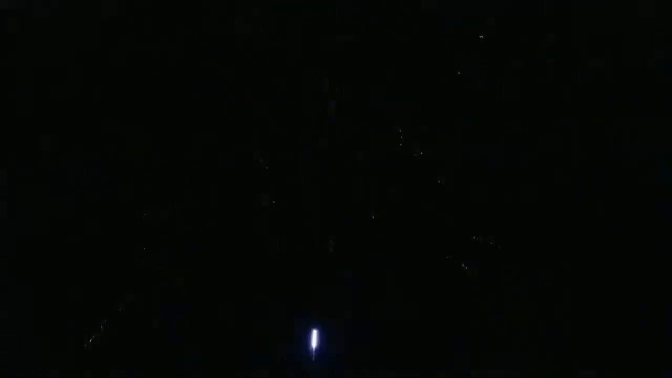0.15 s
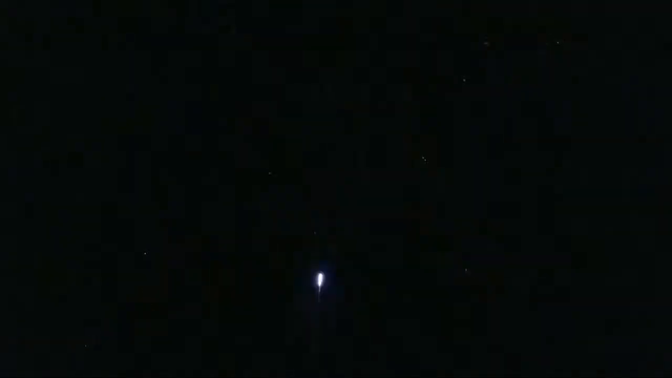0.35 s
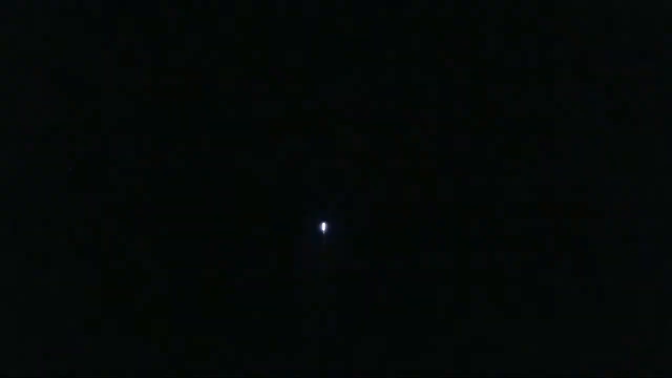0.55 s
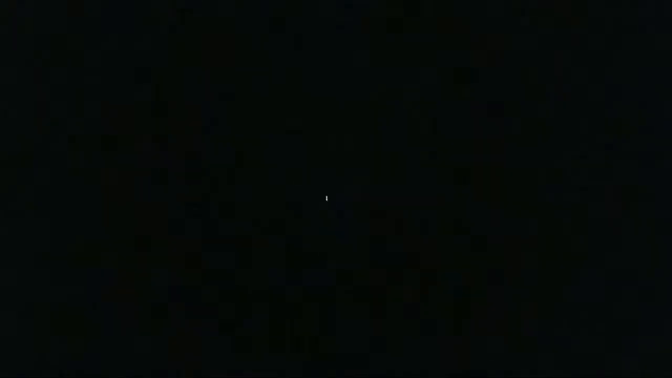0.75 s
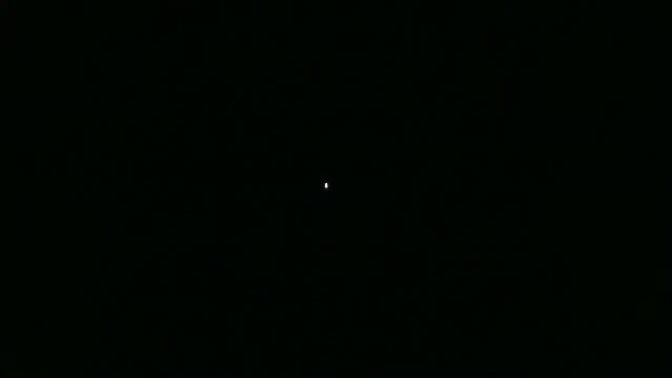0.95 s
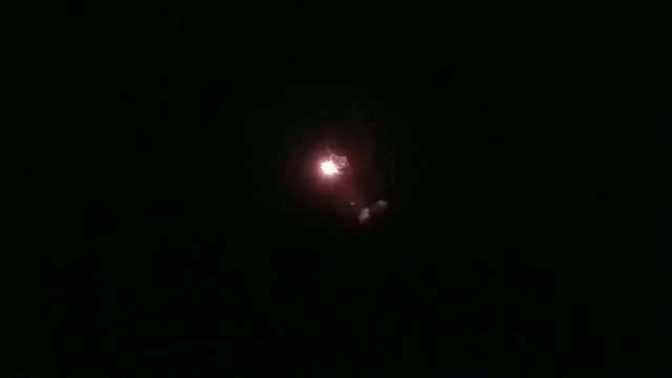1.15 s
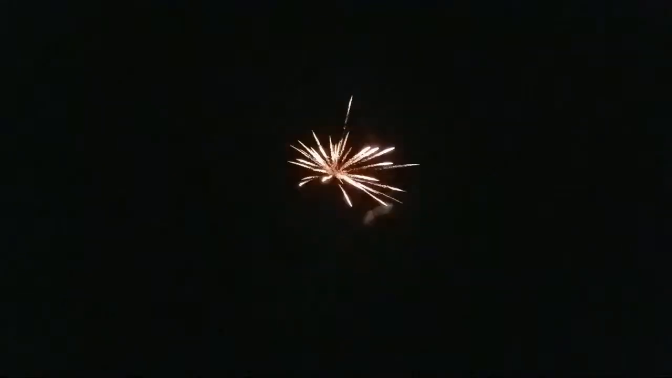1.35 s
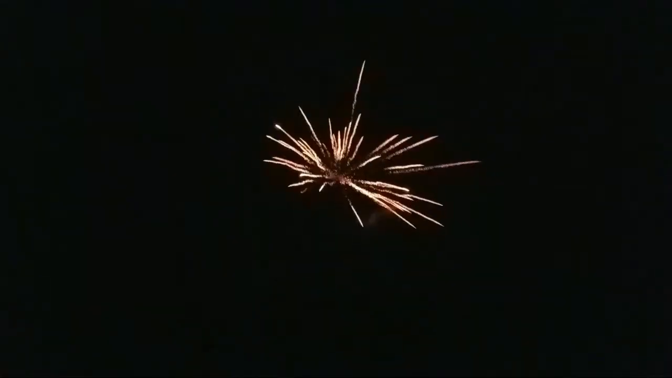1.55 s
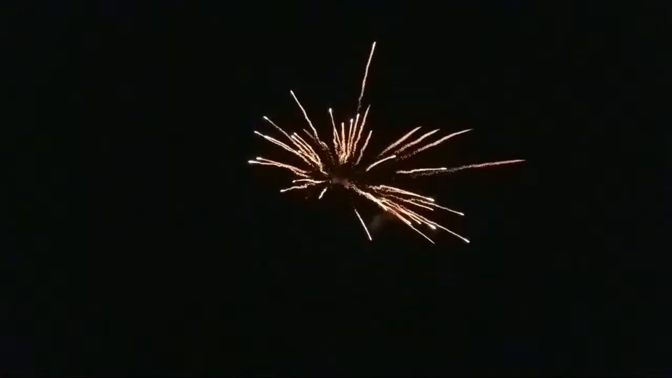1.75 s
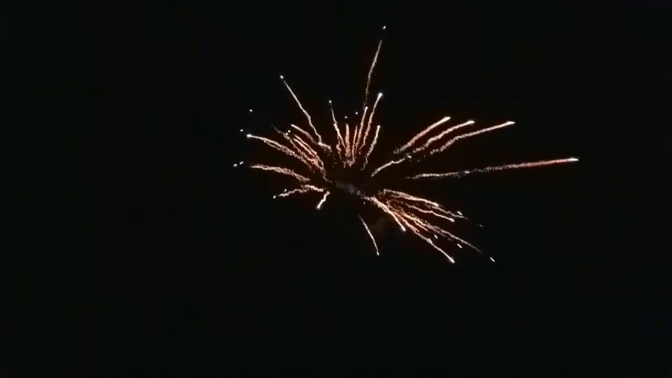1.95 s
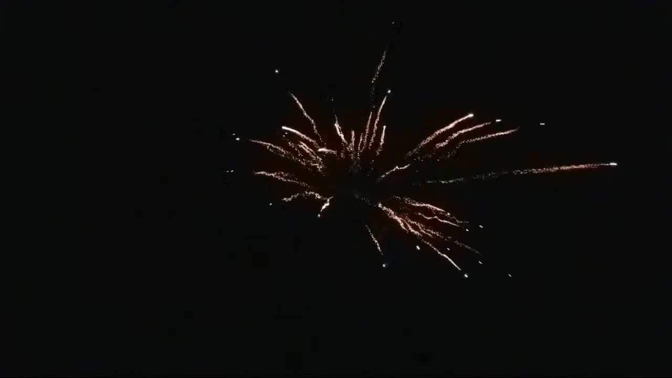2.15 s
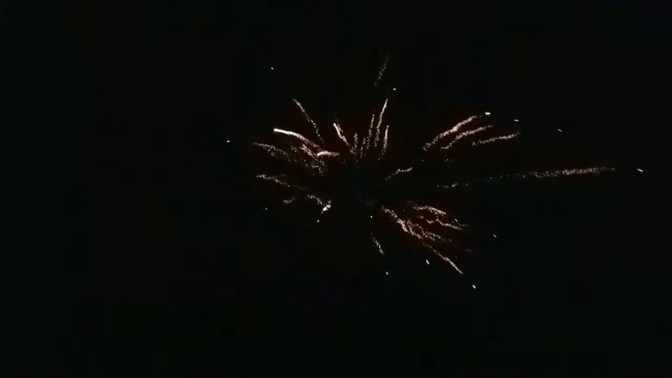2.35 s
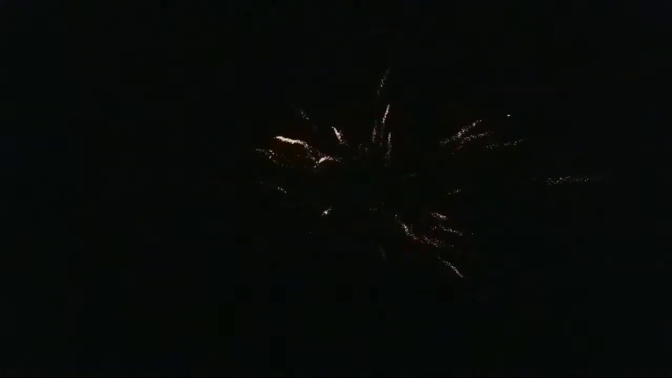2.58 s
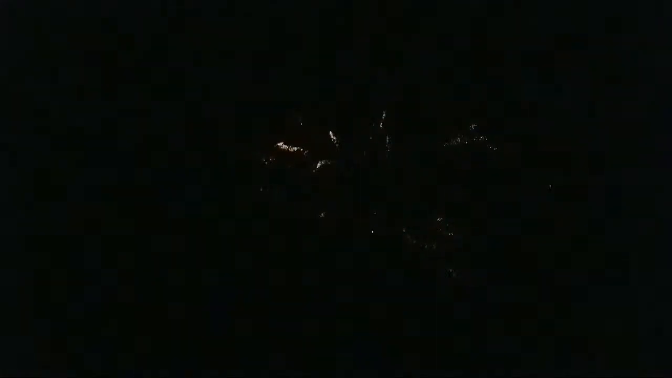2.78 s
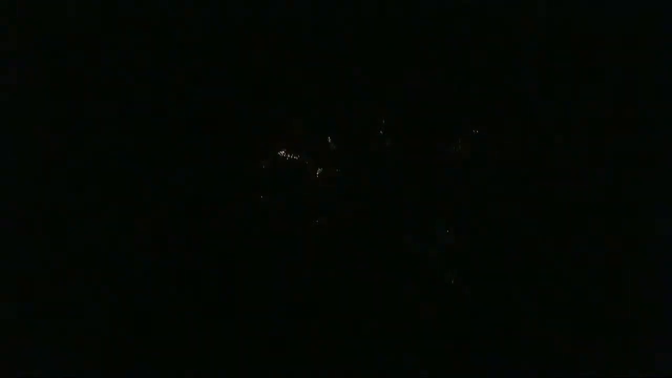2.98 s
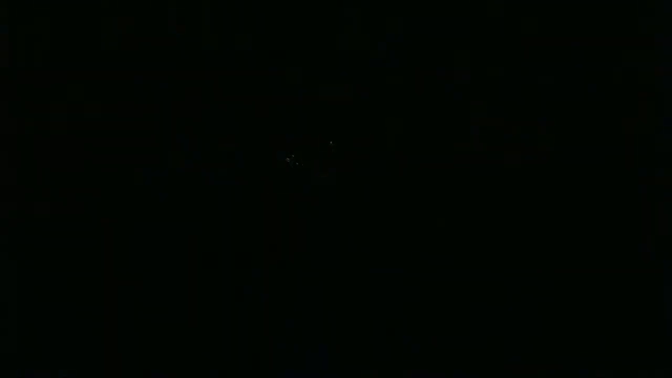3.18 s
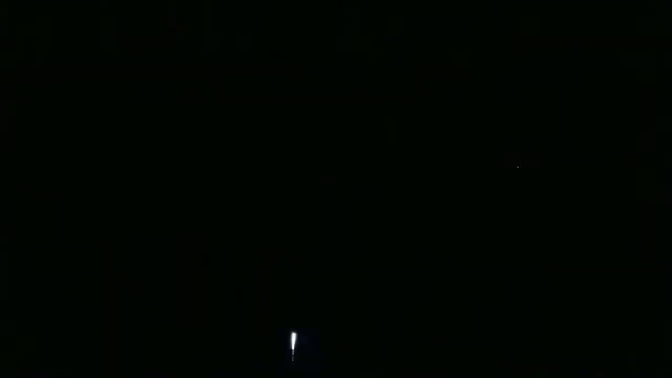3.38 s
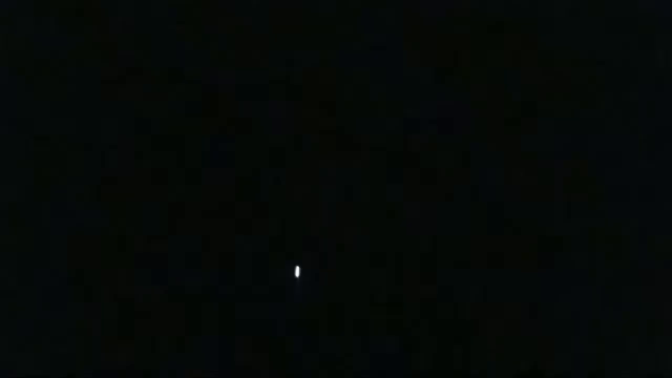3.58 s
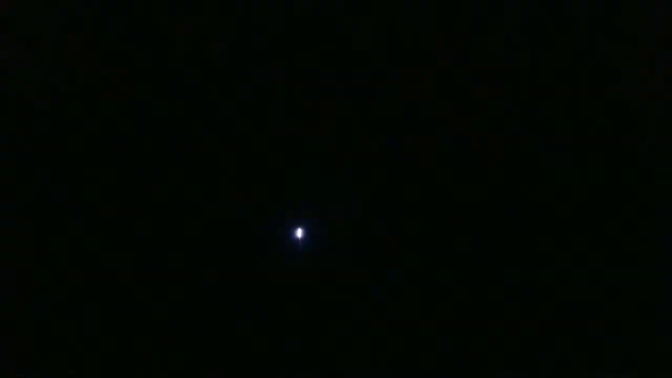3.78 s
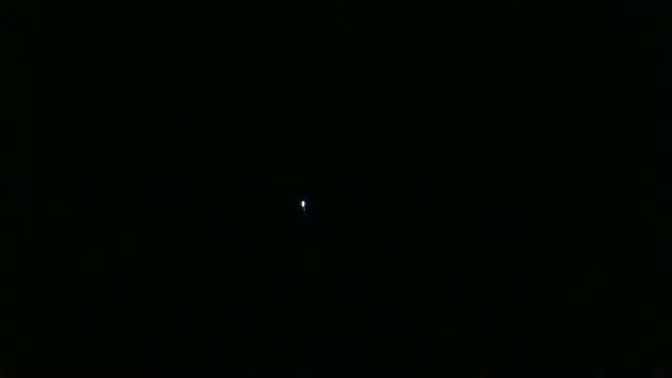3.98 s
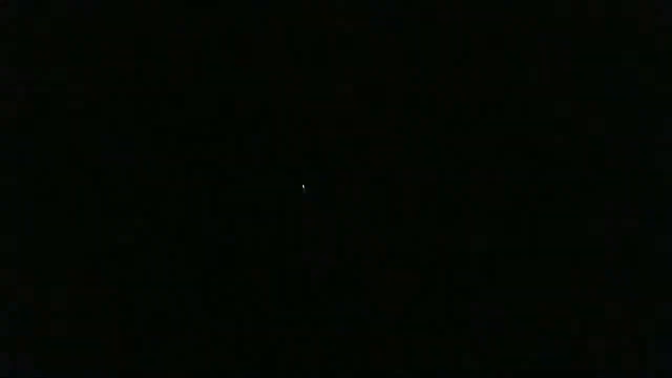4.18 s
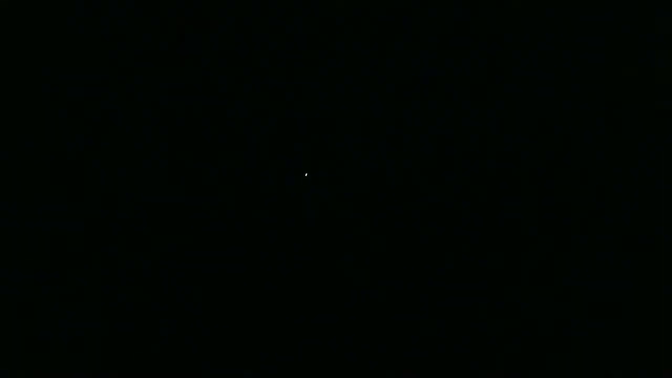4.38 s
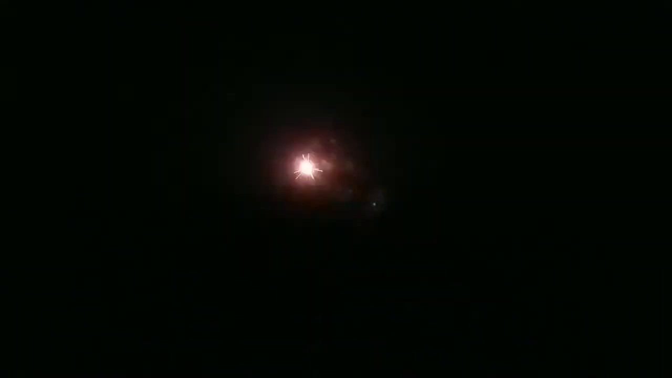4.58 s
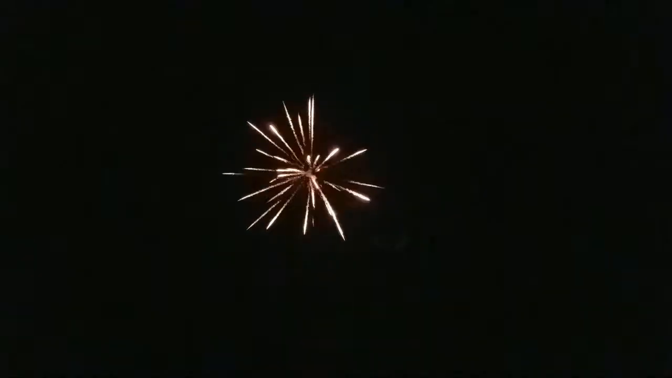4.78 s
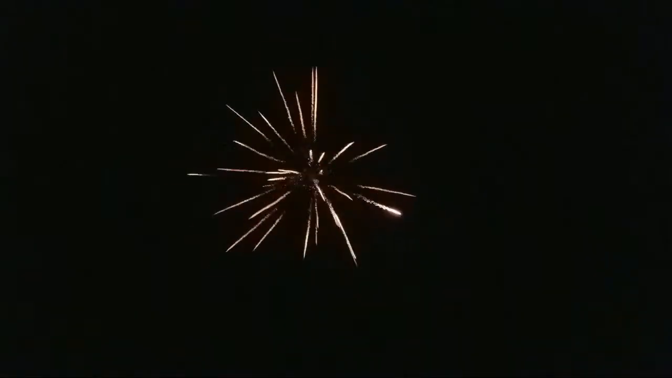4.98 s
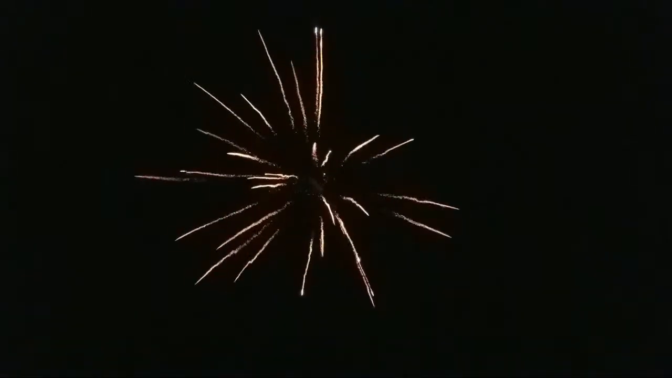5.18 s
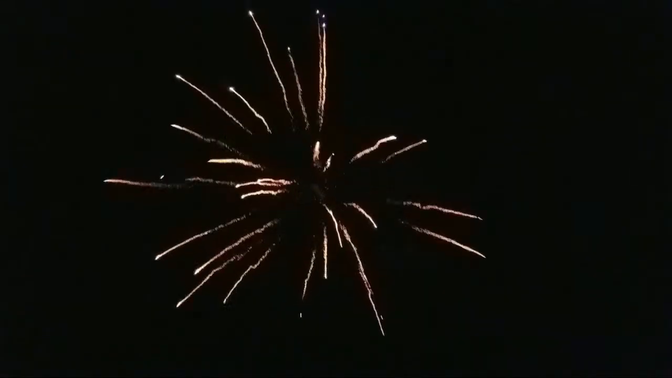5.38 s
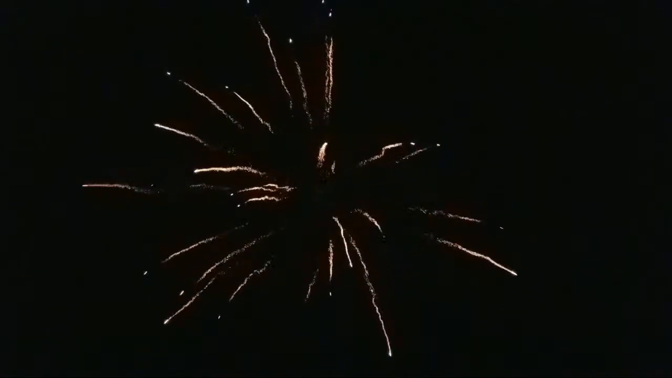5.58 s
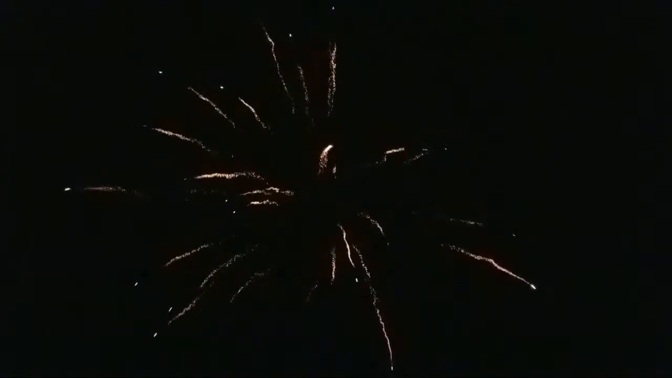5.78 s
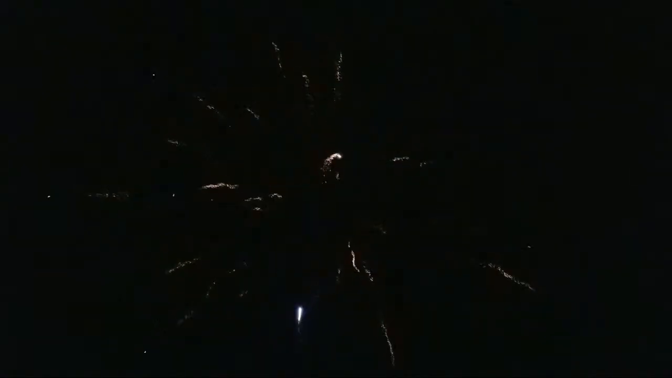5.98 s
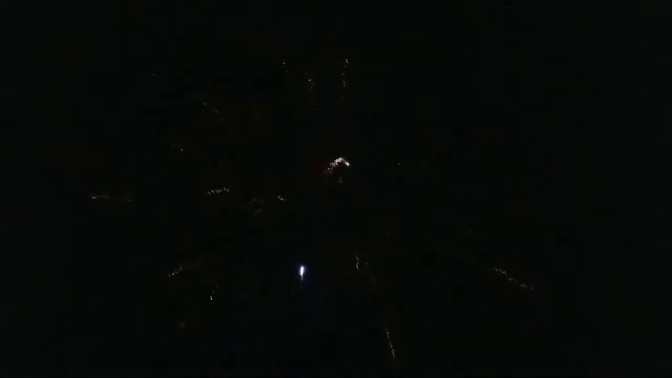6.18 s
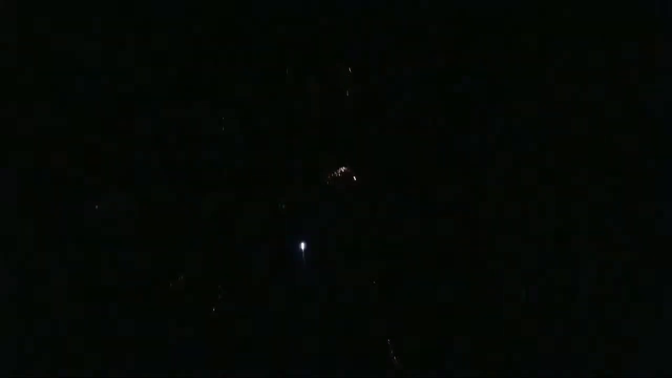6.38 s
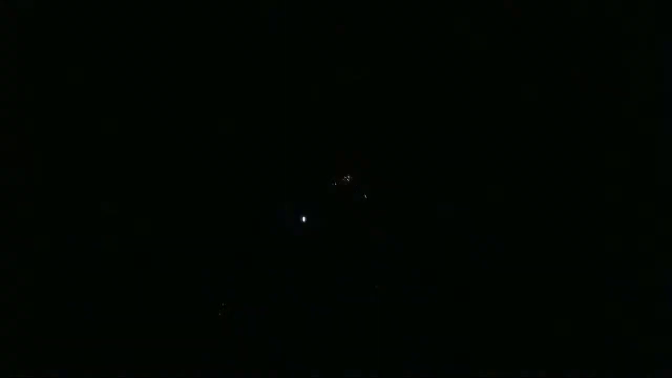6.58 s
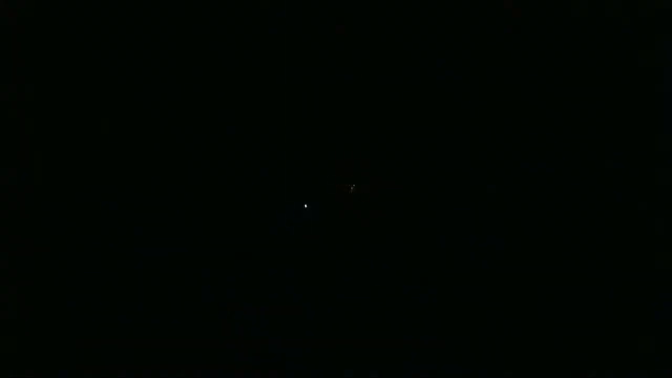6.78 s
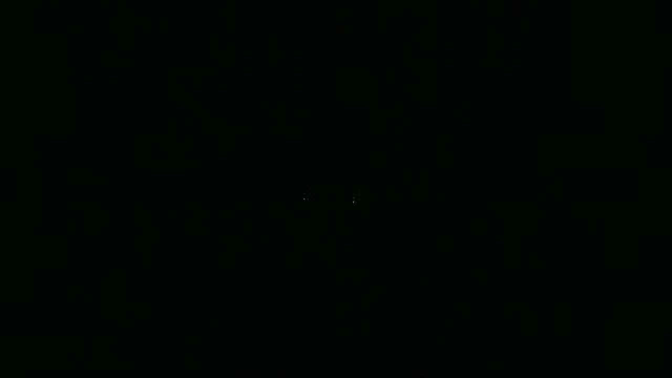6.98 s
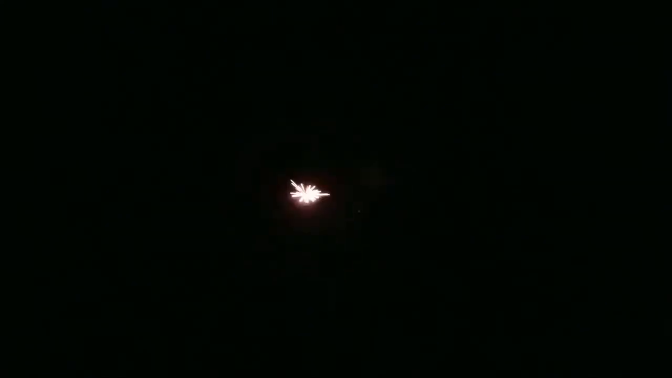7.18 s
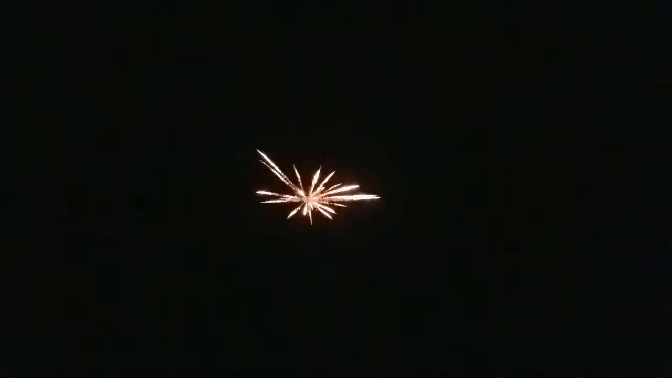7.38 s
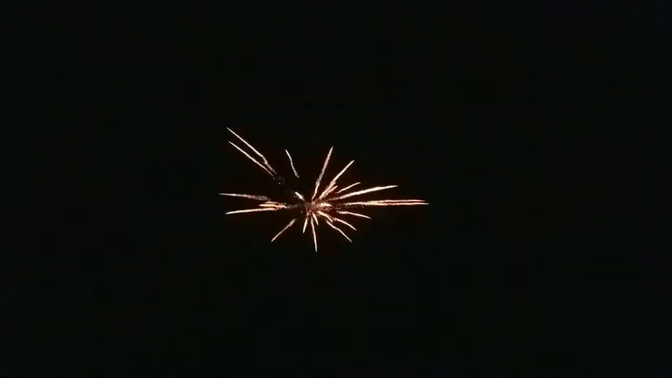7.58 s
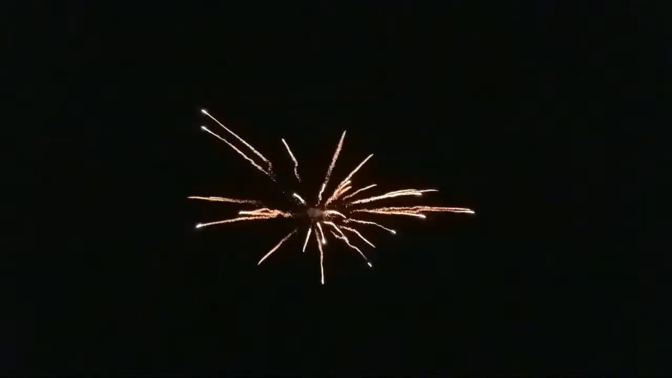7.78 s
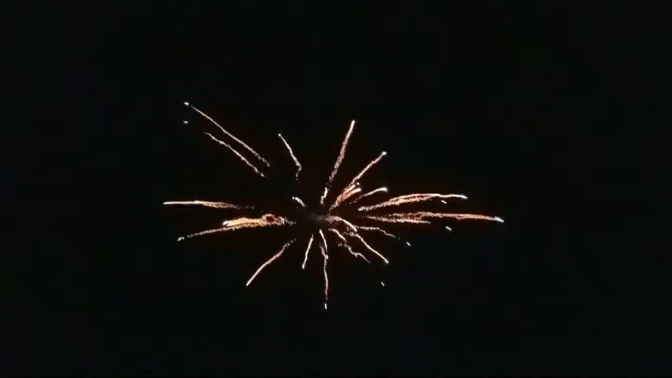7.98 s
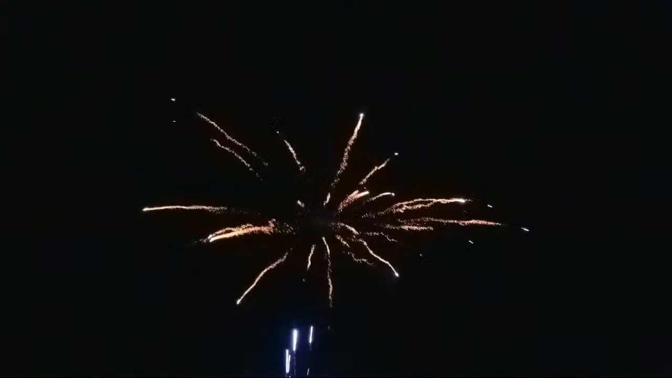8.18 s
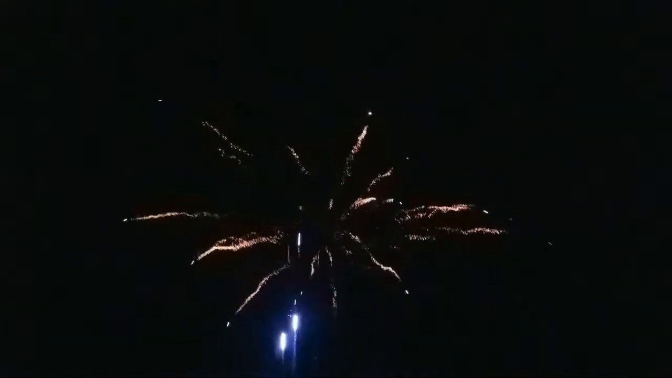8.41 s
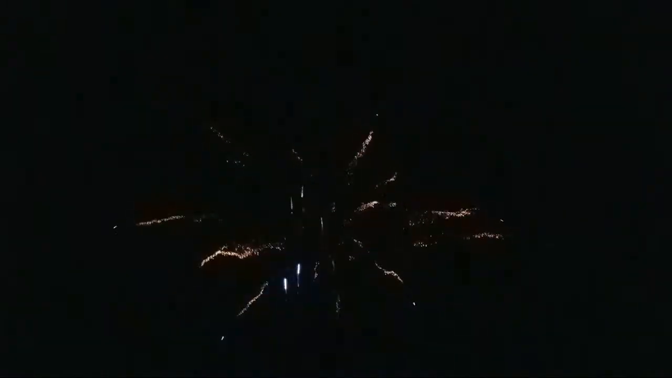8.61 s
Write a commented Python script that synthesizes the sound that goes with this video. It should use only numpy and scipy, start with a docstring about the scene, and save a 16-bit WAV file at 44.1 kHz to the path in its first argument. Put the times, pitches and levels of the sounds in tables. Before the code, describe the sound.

Three loud shell cracks burst overhead after dull launch thumps, each rolling away across a neighbourhood, over faint road drone, before five quick launch thuds.

```python
"""The tail of a mortar's thump comes first, over a far vehicle's drone; then firework shells crack open overhead at night.
Mortars are snaps plus hollow pressure pulses; shells add a ragged casing crack, a thud and a ground bounce.
Walls return filtered copies; roofs, trees, gardens and far slopes answer with shaped noise.
Beneath lie wavering engine tones that sink in pitch, tyre noise, a faint hum and quiet night air.
A small mono microphone with a very bright top octave overloads on the peaks."""
import sys
import numpy as np
from scipy import signal
from scipy.fft import rfft, irfft, next_fast_len
from scipy.io import wavfile
from scipy.ndimage import uniform_filter1d

SR = 44100
rng = np.random.default_rng(int(sys.argv[2]) if len(sys.argv) > 2 else 0)


def persist_wave(psi):
    """Save psi, clipped to +-1, as 16-bit WAV."""
    counts = np.round(np.clip(psi, -1, 1) * 32767).astype(np.int16)
    wavfile.write(sys.argv[1], SR, np.atleast_2d(counts).T)


N = 381465
T = np.arange(N) / SR  # seconds


def undb(db):
    """Turn decibels into gain."""
    return 10 ** (np.asarray(db) / 20)


def at(points, hz):
    """Read a curve of (Hz, value) points on a log-frequency axis."""
    point_hz, value = np.transpose(points)
    return np.interp(np.log(np.maximum(hz, 1)), np.log(point_hz), value)


def add(out, start_s, sound):
    """Mix a sound in at start_s; a negative start leaves only its tail."""
    start = int(round(start_s * SR))
    sound = sound[max(-start, 0):]
    start = max(start, 0)
    out[start:start + len(sound)] += sound[:len(out) - start]


def noise(colour, size):
    """White noise shaped to a (Hz, dB) colour."""
    padded = next_fast_len(size)
    spectrum = rfft(rng.standard_normal(padded))
    gain = undb(at(colour, np.fft.rfftfreq(padded, 1 / SR)))
    return irfft(spectrum * gain, padded)[:size]


def walk(rate_hz, size=N):
    """Random drift that glides to a new value rate_hz times a second."""
    hold = int(SR / rate_hz)
    steps = np.repeat(rng.standard_normal(size // hold + 1), hold)
    return uniform_filter1d(steps, hold)[:size]


def dull(x, hz):
    """One-pole loss of treble."""
    return signal.lfilter(*signal.butter(1, min(hz, SR / 3), fs=SR), x)


def band(x, low_hz, high_hz):
    """Gentle one-pole loss of bass and treble."""
    return signal.lfilter(*signal.butter(1, low_hz, "high", fs=SR), dull(x, high_hz))


def treble(x, db, corner_hz=3000):
    """Raise or lower everything above a corner."""
    body = dull(x, corner_hz)
    return body + undb(db) * (x - body)


def pulse(colour, ratio, tilt_db, size=8192):
    """A shock front and its swing back, with energy as early as the colour allows; small charges sound higher."""
    hz = np.fft.rfftfreq(size, 1 / SR)
    # the charge's size moves the boom, but hardly the crack above it
    shift = ratio ** (1 / (1 + (hz / 1500) ** 2))
    db = at(colour, hz / shift) + tilt_db * np.log2(1 + hz / 300)
    # folding the cepstrum forward gives minimum phase
    cepstrum = irfft(np.log(undb(db)))
    cepstrum[1:size // 2] *= 2
    cepstrum[size // 2 + 1:] = 0
    return irfft(np.exp(rfft(cepstrum)))[:size // 4]


def snap(hz, q, decay_s, size=2048):
    """Card gives way: a few milliseconds of ragged crack around one pitch."""
    burst = rng.standard_normal(size) * np.exp(-T[:size] / decay_s)
    crack = signal.lfilter(*signal.iirpeak(hz, q, fs=SR), burst)
    # every crack of the same decay carries the same energy
    return crack * np.sqrt(decay_s * SR / 2 / np.sum(crack ** 2))


def walls(blast, echoes):
    """Nearby walls return distinct, thinner copies of a report."""
    out = np.zeros(SR // 2)
    for delay_s, level_db, low_hz, high_hz in echoes:
        add(out, delay_s, undb(level_db) * band(blast, low_hz, high_hz))
    return out


def cluster(colour, delay_s, rise_s, decay_s, lumpy_db):
    """A group of reflectors, such as roofs or trees, throws back a dense, lumpy clap."""
    t = np.maximum(T[:SR] - delay_s, 0)
    lumps = undb(lumpy_db * walk(110, len(t)))
    envelope = (1 - np.exp(-t / rise_s)) * np.exp(-t / decay_s)
    return noise(colour, len(t)) * lumps * envelope


# How long scattered sound lingers, before scaling by the length of the tail:
# band_hz [Hz], t60_s [s]
SCATTER_DECAY = [(50, 1.1), (150, 0.92), (600, 1.76), (1200, 1.445), (2500, 1.185), (5000, 0.84),
                 (9000, 0.8), (15000, 0.4)]


def scatter(colour, length, rise_s, grain_db, size=65536, count=10):
    """Countless small echoes off fences and trees; every band dies at its own rate."""
    t, hz = T[:size], np.fft.rfftfreq(size, 1 / SR)
    uneven = undb(grain_db * walk(160, size))
    grains = rng.standard_normal(size) * uneven / np.sqrt(np.mean(uneven ** 2))
    spectrum = rfft(grains) * undb(at(colour, hz))
    centres = np.geomspace(70, 14000, count)
    out = 0
    # overlapping bands add up to the whole spectrum
    for centre, share in zip(centres, np.eye(count)):
        part = irfft(spectrum * at(np.c_[centres, share], hz))
        t60_s = length * at(SCATTER_DECAY, centre)
        out = out + part * np.exp(-np.log(1000) * t / t60_s)
    return out * (1 - np.exp(-t / rise_s))


# Colour of the roll from distant slopes, before each echo's own tilt:
# band_hz [Hz], level_db [dB]
SLOPES = [(40, -48.5), (120, -29.5), (280, -27), (600, -26.5), (1000, -39), (2000, -51), (4000, -67.5),
          (8000, -104), (16000, -110)]


def far_echo(delay_s, tilt_db, spread, flutter_db):
    """Distant slopes return a dull roll that swells and ebbs."""
    t = T[1:4 * SR]
    swell = 1 / (1 + (np.log(t / delay_s) / spread) ** 2)
    ebb = (1 - t / t[-1]) / (1 - delay_s / t[-1])
    onset = np.minimum(t / delay_s, 1)
    colour = [(hz, db + tilt_db * np.log2(hz / 600)) for hz, db in SLOPES]
    return noise(colour, len(t)) * swell * ebb * onset * undb(flutter_db * walk(25, len(t)))


# Lift charges: start_s [s], level_db [dB], size_ratio [pitch ratio], treble_db [dB],
# scatter_db [dB], snap_hz [Hz], snap_db [dB]
LIFTS = [(-.1, -14, 0.94, -3, -0.5, 3000, -23), (3.1000, 2, 0.99, -1, 2.26, 2830, -18),
         (5.6267, -1.5, 0.92, 2, -1.3, 3400, -20), (7.931, -2.5, 0.96, 2, -2.5, 2530, -21),
         (7.976, -3, 0.92, 4, -8.5, 3230, -24), (8.0253, -4, 0.98, 1, -6.5, 2630, -25),
         (8.0658, -6, 1.05, -4, -7, 2216, -19.5), (8.1042, -5, 0.97, -8, -2.5, 2180, -17)]
# Pressure pulse out of the tube: band_hz [Hz], level_db [dB]
LIFT_PULSE = [(30, -34), (70, 21.5), (160, 35), (290, 34.5), (400, 28), (560, 11.5), (1200, 9.5), (3100, 4),
              (6000, -22), (16000, -12)]
# Wall returns: delay_s [s], level_db [dB], bass_limit_hz [Hz], treble_limit_hz [Hz]
LIFT_WALLS = [(0.0167, -23, 198.4, 2482), (0.0238, -24, 205.5, 1990), (0.0416, -7, 29.99, 2270),
              (.0495, -16.5, 60, 1500), (0.107, -21, 60, 1200)]
# Ground-level clutter near the microphone, also used by shells: band_hz [Hz], level_db [dB]
YARD_COLOUR = [(30, -29), (70, -12.5), (150, -5), (330, -3.5), (600, -15.5), (1200, -41), (4000, -47.5),
               (16000, -54.5)]
# Returns from groups of trees, also used by shells: band_hz [Hz], level_db [dB]
TREE_COLOUR = [(40, -69), (200, -22), (450, -25.5), (800, -23), (1500, -34), (3000, -46), (6000, -79),
               (16000, -54)]
# Garden scatter of a lift charge: band_hz [Hz], level_db [dB]
LIFT_GARDENS = [(30, -63), (90, -5.5), (200, -13.5), (400, -24.5), (700, -22), (1300, -27.5), (3000, -27),
                (5000, -33.5), (9000, -35.5), (16000, -33)]


def mortars(trees_db=6.0, far_db=-23, yard_db=-4, snap_q=2.1):
    """Lift charges in card tubes: snap and hollow thump, slapped back by a house; low down they carry less far."""
    out = np.zeros(N)
    for start_s, level_db, size_ratio, treble_db, scatter_db, snap_hz, snap_db in LIFTS:
        thump = undb(level_db) * pulse(LIFT_PULSE, size_ratio, 0)
        crack = undb(snap_db) * snap(snap_hz, q=snap_q, decay_s=0.0026)
        blast = treble(thump + crack, treble_db)
        yard = undb(yard_db) * cluster(YARD_COLOUR, delay_s=0.0088, rise_s=0.019, decay_s=0.045, lumpy_db=6)
        trees = undb(trees_db) * cluster(TREE_COLOUR, delay_s=0.084, rise_s=0.023, decay_s=0.061, lumpy_db=2.5)
        gardens = scatter(LIFT_GARDENS, length=0.67, rise_s=0.02, grain_db=1.5)
        roll = far_echo(0.87, 0, spread=0.37, flutter_db=3.0)
        add(out, start_s, blast)
        add(out, start_s, walls(blast, LIFT_WALLS))
        add(out, start_s, undb(scatter_db) * (yard + trees))
        add(out, start_s, undb(scatter_db) * treble(gardens, treble_db / 2))
        add(out, start_s, undb(scatter_db + far_db) * roll)
    return out


# A fast vehicle on a far road
SPEED_M_S, PASSES_S, ROAD_M = 38, 1.45, 88
# Houses hide it except along one open stretch
OPEN_FROM_S, OPEN_UNTIL_S, EDGE_S, HIDDEN_DB = .42, 5.2, 0.25, -11.5
# One house stands in that stretch and casts a sound shadow
SHADOW_S, SHADOW_HALF_S, SHADOW_DB = 1.78, .32, -12


def passing():
    """The vehicle's distance (m), Doppler ratio and shading by houses (dB), sample by sample."""
    along = SPEED_M_S * (T - PASSES_S)
    distance = np.hypot(along, ROAD_M)
    doppler = 1 / (1 + SPEED_M_S / 343 * along / distance)  # sound travels at 343 m/s
    in_sight = (np.tanh((T - OPEN_FROM_S) / EDGE_S) - np.tanh((T - OPEN_UNTIL_S) / EDGE_S)) / 2
    shadow = np.exp(-np.square((T - SHADOW_S) / SHADOW_HALF_S))
    return distance, doppler, HIDDEN_DB * (1 - in_sight) + SHADOW_DB * shadow


def drone(hz, db, waver_db, wobble):
    """A low tone that wavers in level and pitch on its long way through the air."""
    phase = 2 * np.pi * np.cumsum(hz * (1 + wobble * walk(9))) / SR
    return np.sqrt(2) * undb(db + waver_db * walk(10)) * np.sin(phase)


# Engine tones, each beamed its own way: multiple [of the firing rate], level_db [dB],
# loudest_s [s], fade_db_per_s [dB/s]
ENGINE_PARTIALS = [(1, -41, 2.15, 6), (1.5, -56.5, 3.3, 2.5), (1.65, -51, .4, 3), (2, -54, 4.3, 2),
                   (2.5, -54.5, 1.05, 5.5)]


def engine(doppler, shade_db, firing_hz=79):
    """Only the lowest tones carry this far; they sink together as the vehicle passes, each swelling and fading."""
    out = np.zeros(N)
    for multiple, level_db, loudest_s, fade_db_per_s in ENGINE_PARTIALS:
        beamed_db = level_db - fade_db_per_s * np.abs(T - loudest_s)
        out += drone(multiple * firing_hz * doppler, beamed_db + shade_db, waver_db=2, wobble=.005)
    return out


# Colour of the tyre roar: band_hz [Hz], level_db [dB]
TYRE_COLOUR = [(30, -62), (70, -35.5), (120, -28), (190, -34), (270, -42), (600, -45.5), (1200, -49.5),
               (3000, -64.5), (8000, -81.5), (16000, -90)]


def tyres(distance, shade_db, level_db=4, ground_db_per_m=.08, shade_share=0.28):
    """Tyre roar weakens with distance and over the ground, and feels a share of the houses' shadow."""
    loss_db = ground_db_per_m * (distance - ROAD_M)
    level = ROAD_M / distance * undb(level_db - loss_db + shade_share * shade_db)
    return noise(TYRE_COLOUR, N) * level * undb(1.2 * walk(12))


# Still night air: band_hz [Hz], level_db [dB]
AIR_COLOUR = [(30, -50), (70, -43), (105, -37.5), (175, -46.5), (600, -51), (1000, -55), (2000, -59),
              (4000, -71), (8000, -83.5), (16000, -90)]


def night_air():
    """Quiet broadband air that drifts slowly in level."""
    return noise(AIR_COLOUR, N) * undb(.7 * walk(2))


def background():
    """A far vehicle passes and draws away, over a distant machine's faint hum and quiet night air."""
    distance, doppler, shade_db = passing()
    hum = drone(hz=116, db=-62.5, waver_db=1.0, wobble=.005)
    return engine(doppler, shade_db) + hum + tyres(distance, shade_db) + night_air()


def thud(hz, decay_s, low_hz=75, size=4096):
    """Expanding gas: one slow push and its dying swing, without the deepest bass."""
    swing = np.sin(2 * np.pi * hz * T[:size]) * np.exp(-T[:size] / decay_s)
    return signal.lfilter(*signal.butter(2, low_hz, "high", fs=SR), swing)


# Shells bursting: start_s [s], level_db [dB], size_ratio [pitch ratio], tilt_db [dB/octave], boom_db [dB],
# scatter_db [dB], scatter_treble_db [dB], far_db [dB], far_delay_s [s], far_tilt_db [dB/octave]
SHELL_BURSTS = [(1.3575, 1, 1, -1.5, 3, 1, 0, 0, 0.87, 2),
                (4.8056, -2, 1.88, -0.1, 0, -1.5, 0, -4, 0.71, 3.5),
                (7.3615, 2, 1, -0.5, 7, 1.5, 0, -2, 0.72, 5)]
# Pressure pulse of a burst: band_hz [Hz], level_db [dB]
SHELL_PULSE = [(20, 2), (70, 29.5), (140, 36), (250, 31.5), (520, 29), (1000, 19.5), (2000, 17.5),
               (4000, 11), (7000, -4.5), (16000, -8)]
# Wall returns, small ones without bass: delay_s [s], level_db [dB], bass_limit_hz [Hz], treble_limit_hz [Hz]
SHELL_WALLS = [(.0078, -10.5, 98.8, 3098), (0.0126, -11, 149, 1500), (0.0198, -17.5, 147.4, 1220),
               (0.0341, -15, 503, 5880), (0.0354, -14.5, 500, 3950), (0.0429, -11, 400, 2500),
               (0.0461, -10.5, 221.7, 1838), (0.056, -13.5, 100.6, 1200), (.066, -22.5, 300, 1500)]
# Diffuse sound from the roofs: band_hz [Hz], level_db [dB]
ROOF_COLOUR = [(30, -28.5), (60, -17), (95, -4.5), (200, -6), (450, -2.5), (1000, -11.5), (2500, -17.5),
               (5000, -28.5), (16000, -43.5)]
# Garden scatter of a burst: band_hz [Hz], level_db [dB]
SHELL_GARDENS = [(30, -41), (80, -16), (150, -14), (300, -19), (650, -16), (1100, -23.5), (2200, -25),
                 (4000, -30), (8000, -36.5), (16000, -28.5)]


def shells(ground_s=0.00535, ground_db=-1, ground_low_hz=90, ground_high_hz=1100, casing_db=-13,
           thud_db=-16.5, thud_lag_s=.0023, grove_db=-5.5, grove_hz=1000):
    """Bursts high in the air: crack, thud, bounce off the ground, then the whole neighbourhood answers."""
    out = np.zeros(N)
    for (start_s, level_db, size_ratio, tilt_db, boom_db,
         scatter_db, treble_db, far_db, far_s, far_tilt_db) in SHELL_BURSTS:
        casing = undb(casing_db) * snap(hz=1300, q=0.73, decay_s=0.0019)
        blast = undb(level_db) * (casing - pulse(SHELL_PULSE, size_ratio, tilt_db))
        push = undb(thud_db + boom_db) * thud(hz=115, decay_s=.008)
        bounce = undb(ground_db) * band(blast, ground_low_hz, ground_high_hz)
        yard = cluster(YARD_COLOUR, delay_s=.008, rise_s=.003, decay_s=.016, lumpy_db=1.5)
        roofs = cluster(ROOF_COLOUR, delay_s=.03, rise_s=.004, decay_s=.023, lumpy_db=2)
        # a shell with less boom also gets less bass back from the roofs
        roofs = undb(boom_db) * treble(roofs, -boom_db, corner_hz=252)
        trees = cluster(TREE_COLOUR, delay_s=0.1, rise_s=.01, decay_s=0.052, lumpy_db=7.5)
        # a further stand of trees answers later and duller
        grove = cluster(TREE_COLOUR, delay_s=.44, rise_s=.02, decay_s=.08, lumpy_db=2)
        grove = undb(grove_db) * dull(grove, grove_hz)
        gardens = scatter(SHELL_GARDENS, length=0.94, rise_s=0.016, grain_db=1.5)
        roll = far_echo(far_s, far_tilt_db, spread=.45, flutter_db=1.7)
        add(out, start_s, blast)
        add(out, start_s + thud_lag_s, push)
        add(out, start_s + ground_s, bounce)
        add(out, start_s, walls(blast, SHELL_WALLS))
        add(out, start_s, undb(boom_db) * yard)
        add(out, start_s, undb(scatter_db) * (roofs + trees + grove))
        add(out, start_s, undb(scatter_db) * treble(gardens, treble_db, corner_hz=1510))
        add(out, start_s, undb(far_db) * roll)
    return out


def scene():
    """Everything that reaches the microphone, as one channel."""
    return (mortars() + background() + shells())[None]


# Corners of the microphone's step up in treble: start_hz [Hz], full_lift_hz [Hz]
LIFT_CORNERS = (11700, 12250)


def record(dry, low_cut_hz=52, shelf_db=18, hiss_db=-76.0, ceiling=0.97, top_hz=15900, padded=2 ** 19):
    """Deep bass is lost, the top octave steps up, the input hisses faintly, peaks are rounded and the top is cut."""
    thin = signal.sosfilt(signal.butter(4, low_cut_hz, "high", fs=SR, output="sos"), dry)
    lift = undb(np.interp(np.fft.rfftfreq(padded, 1 / SR), LIFT_CORNERS, [0, shelf_db]))
    bright = irfft(rfft(thin, padded) * lift)[:, :N]
    hissing = bright + undb(hiss_db) * rng.standard_normal(N)
    # quiet sound passes straight; peaks bend towards the ceiling
    rounded = hissing / np.sqrt(np.sqrt(1 + np.square(np.square(hissing / ceiling))))
    return signal.sosfiltfilt(signal.ellip(8, .1, 60, top_hz, fs=SR, output="sos"), rounded)


dry = scene()
out = record(dry)
persist_wave(out)
```